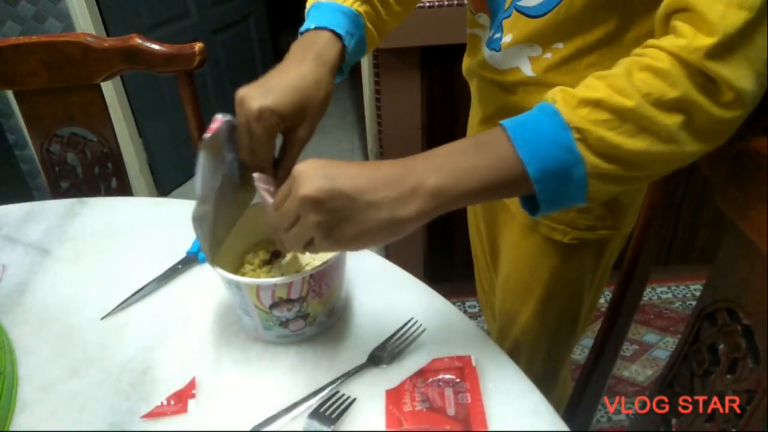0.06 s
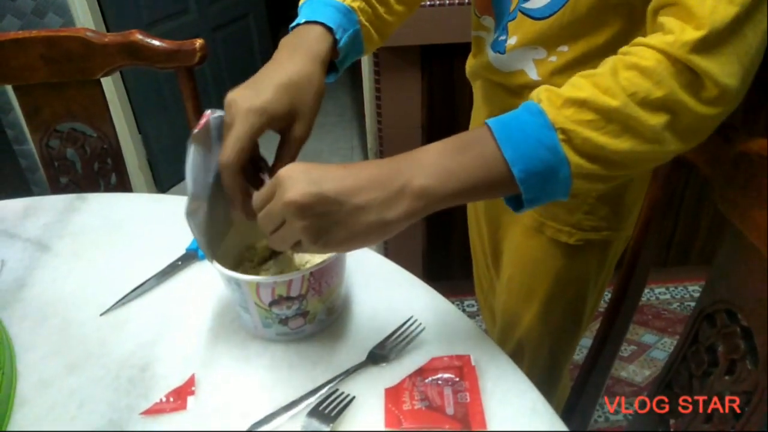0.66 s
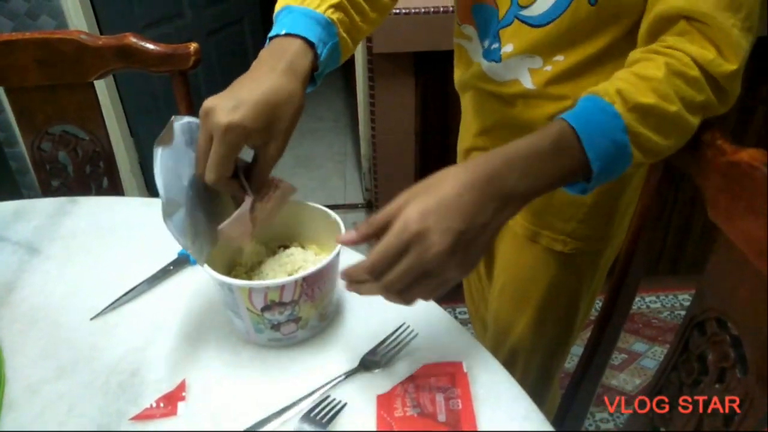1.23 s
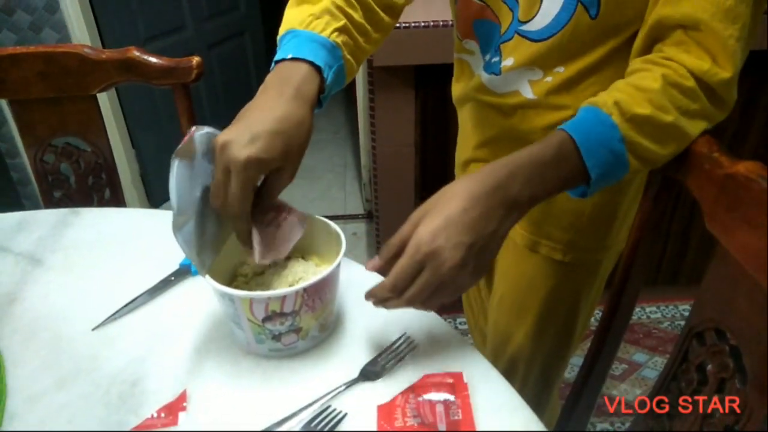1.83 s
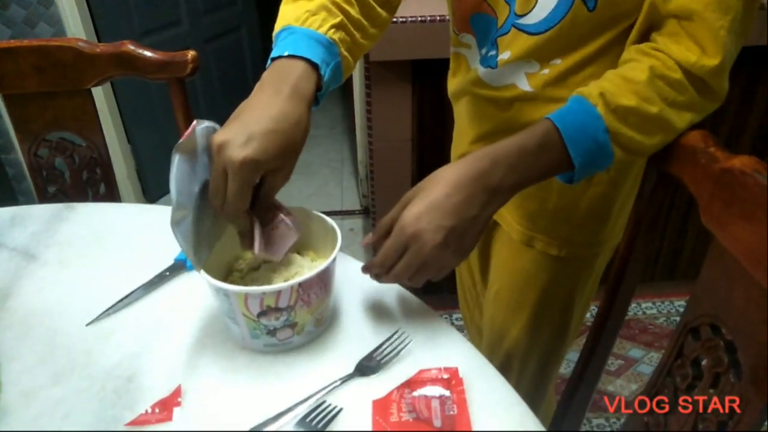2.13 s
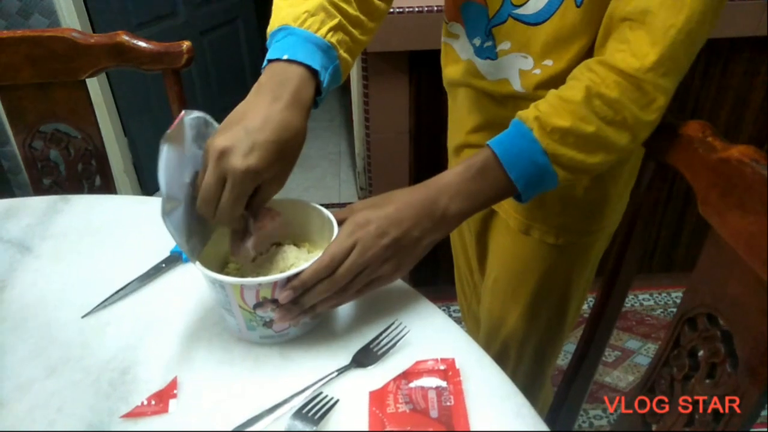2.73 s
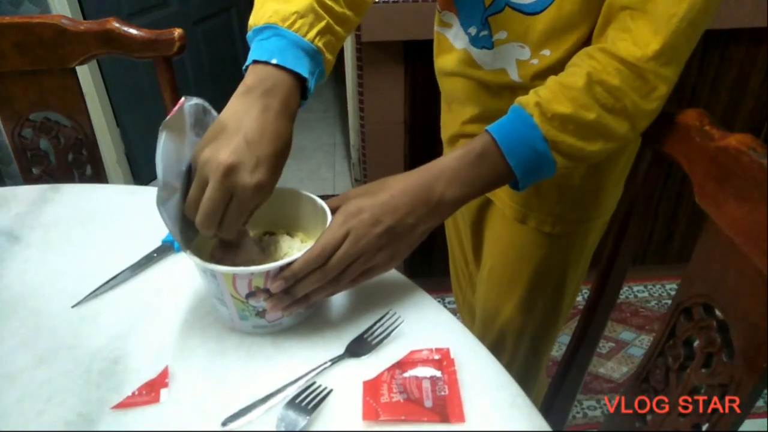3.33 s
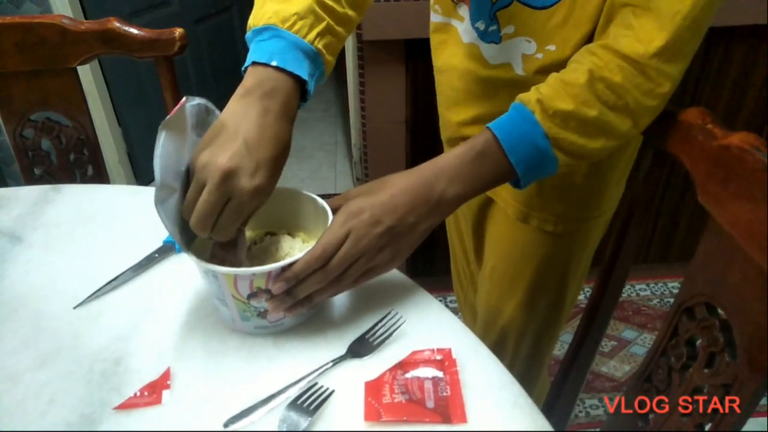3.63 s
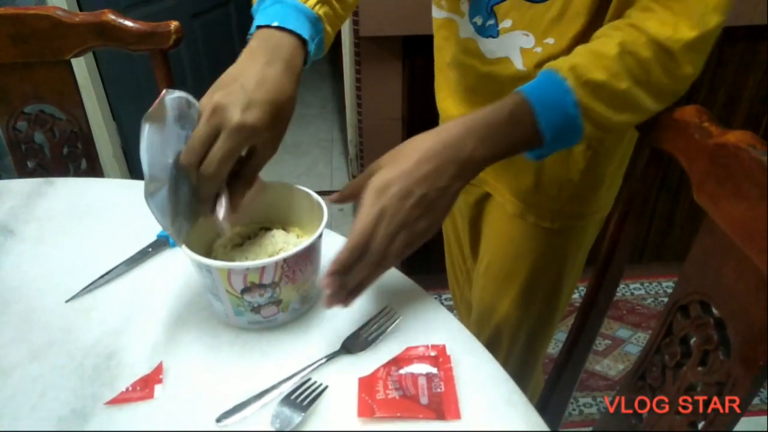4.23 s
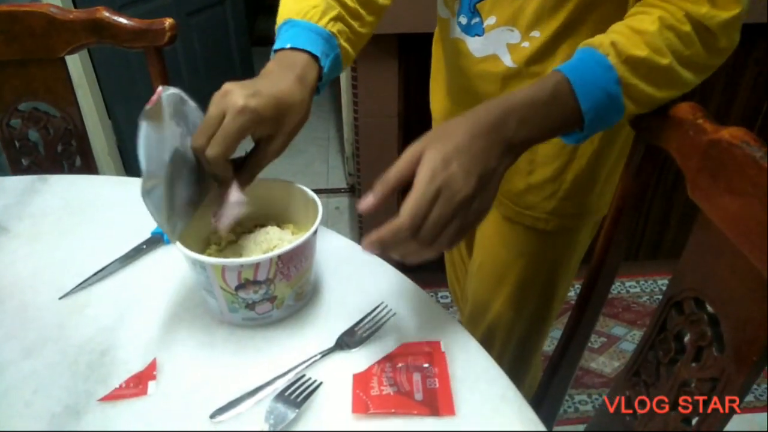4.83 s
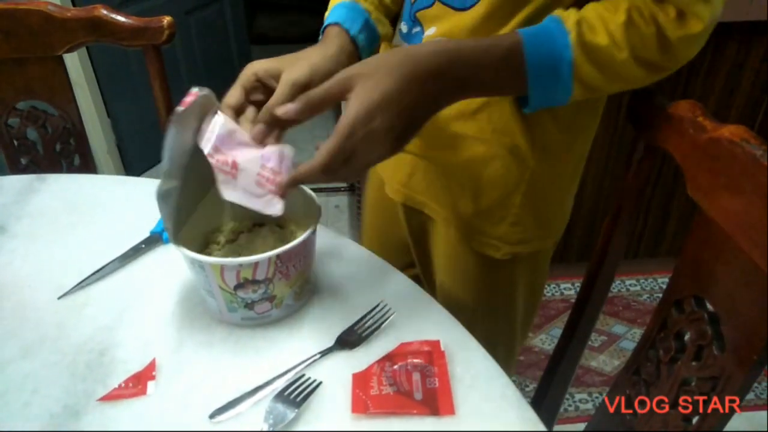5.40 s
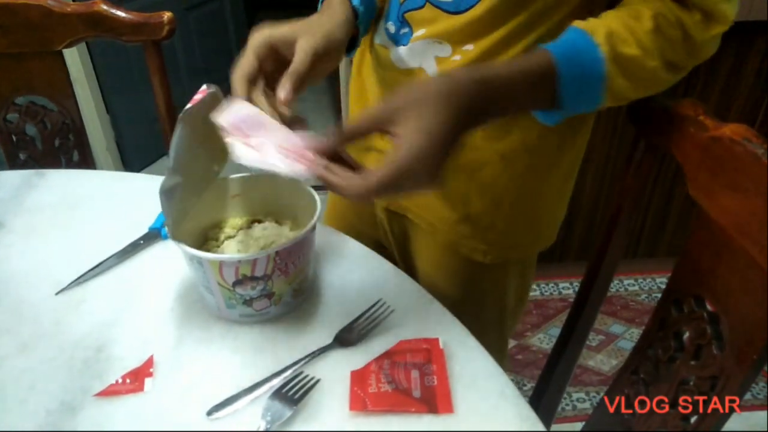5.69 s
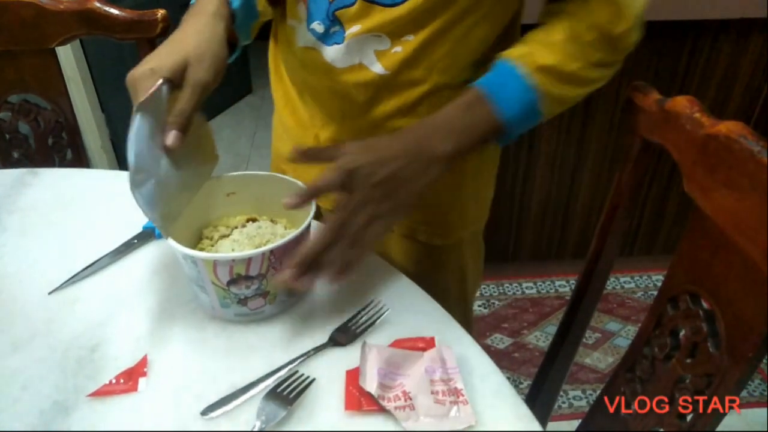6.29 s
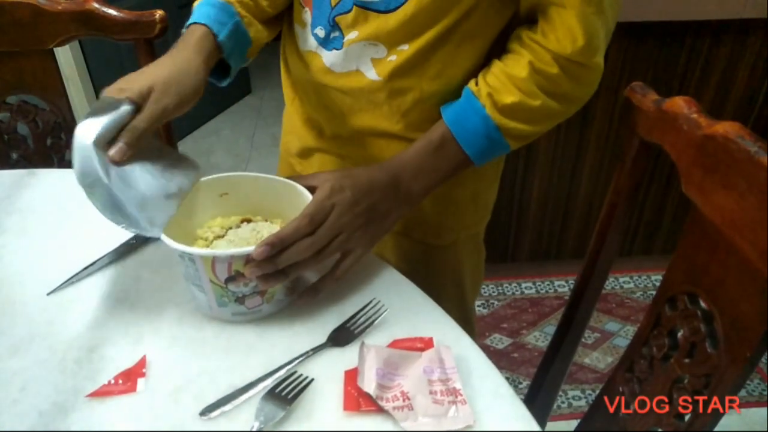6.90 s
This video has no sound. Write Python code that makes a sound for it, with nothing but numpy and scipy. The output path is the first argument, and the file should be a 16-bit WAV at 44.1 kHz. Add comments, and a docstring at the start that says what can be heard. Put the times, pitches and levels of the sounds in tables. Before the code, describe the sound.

A plastic seasoning sachet is kneaded and shaken out over a paper noodle cup. Its creases give sharp snaps amid finer crinkling, with light hollow taps from the cup and brief slides of plastic on fingers. The crackling thins out, the sachet brushes the lid, and the lid is bent back with a short scrape. The microphone is close, in a small room with faint hum and sleeve rustle.

```python
"""A plastic seasoning sachet, squeezed and shaken out over a paper noodle cup on a table in a small room.
Kneaded in bouts, its creases buckle in sharp snaps, finer crinkling swells around each one, and the cup
answers hollowly. The film slides on fingers and lid; near the end it brushes the lid, which is then bent
back. A small microphone hears it close by, with room air, faint hum, sleeves and soft bumps underneath."""
import sys
import numpy as np
from scipy import signal
from scipy.fft import rfft, irfft
from scipy.io import wavfile
from scipy.ndimage import uniform_filter1d

SR = 44100
rng = np.random.default_rng(int(sys.argv[2]) if len(sys.argv) > 2 else 0)


def dump(signal):
    """Clip the signal to [-1, 1] and save it as 16-bit WAV at the path in sys.argv[1]."""
    limited = np.clip(np.atleast_2d(signal).T, -1, 1)
    pcm = np.round(limited * 32767).astype(np.int16)
    wavfile.write(sys.argv[1], SR, pcm)


N = 306495


def amp(db):
    """Decibels to gain."""
    return 10 ** (np.asarray(db) / 20)


def unit_rms(x):
    """Scales to rms 1."""
    return x / np.sqrt(np.mean(x ** 2) + 1e-20)


def unit_click(x):
    """Scales a click to the energy of two milliseconds at rms 1."""
    return x * np.sqrt(.002 * SR / (np.sum(x ** 2) + 1e-20))


def at_hz(points, hz):
    """Interpolates a curve on a log-frequency axis."""
    freqs, values = np.transpose(points)
    return np.interp(np.log(hz + 1), np.log(freqs + 1), values)


def add(mix, start_s, sound):
    """Mixes a sound in at start_s."""
    part = mix[max(round(start_s * SR), 0):][:len(sound)]
    part += sound[:len(part)]


def noise(colour, size, tilt_db=0):
    """Noise of a given colour, tilted by tilt_db an octave."""
    hz = np.fft.rfftfreq(size, 1 / SR)
    gain = amp(at_hz(colour, hz) + tilt_db * np.log2(hz + 1))
    return unit_rms(irfft(rfft(rng.standard_normal(size)) * gain, size))


def flutter(size, width):
    """A random wander of rms 1, smoothed over width samples."""
    return unit_rms(uniform_filter1d(rng.standard_normal(size), width))


def coloured(x, colour, size=1024):
    """A causal filter of unit energy, which keeps attacks sharp."""
    log_gain = np.log(amp(at_hz(colour, abs(np.fft.fftfreq(size, 1 / SR)))))
    taps = np.fft.ifft(np.exp(np.conj(signal.hilbert(log_gain)))).real
    return signal.oaconvolve(x, taps / np.linalg.norm(taps))[:len(x)]


def crackle(grains, per_s, spread_db):
    """A steady patter of grains at random times, most small and a few large."""
    out, hop = np.zeros(N), 16
    for grain in grains:
        chance, draw = rng.random((2, N // hop))
        for step in np.flatnonzero(chance < per_s / len(grains) * hop / SR):
            level_db = spread_db * min(-np.log(draw[step]), 3)
            add(out, (step + draw[step]) * hop / SR, amp(level_db) * grain)
    return unit_rms(out)


# Mains hum in the room: pitch_hz, level_db
HUM_PARTIALS = [(57.5, -73.5), (118.4, -81.5), (238, -76), (355.3, -78.5)]
# Still air around the microphone: freq_hz, gain_db
AIR_COLOUR = [(20, -2), (60, 6), (85, -11), (135, 0.5), (200, -7), (400, -12), (760, -9.5), (1000, -9),
              (1600, -10), (2700, -9), (3500, -20), (4600, -29), (8000, -36), (16000, -26)]
def room_tone(air_db=-59):
    """The room's own sound: a faint, wavering hum in steady air noise."""
    t = np.arange(N) / SR
    knots = np.linspace(0, N / SR, 40)
    hum = np.zeros(N)
    for hz, db in HUM_PARTIALS:
        waver = np.interp(t, knots, rng.standard_normal(len(knots)))
        hum += amp(db) * np.sqrt(2) * np.sin(2 * np.pi * hz * t + waver)
    return hum + amp(air_db) * noise(AIR_COLOUR, N)


# Arms moving at the table: time_s, level_db
SLEEVE_LEVELS = [(0, -55), (.4, -57), (1, -56.5), (2.3, -58), (3.8, -58), (4.5, -59.5), (5, -58.5),
                 (5.5, -59), (5.75, -57), (5.95, -63.5), (6.95, -59.5)]
# Brushing cloth: freq_hz, gain_db
CLOTH_COLOUR = [(25, 9), (110, 1), (250, -1), (450, -5.5), (1000, -1), (2200, -7), (4500, -24),
                (16000, -22.5)]
def sleeves():
    """Sleeves brush softly as the arms move."""
    level_db = np.interp(np.arange(N) / SR, *np.transpose(SLEEVE_LEVELS))
    return amp(level_db) * noise(CLOTH_COLOUR, N)


# Film sliding against lid and fingers: start_s, end_s, level_db
SLIDES = [(0, 0.051, -42), (0.462, 0.554, -48.5), (1.224, 1.285, -38.5), (2.0, 2.068, -41),
          (3.756, 3.824, -39.5), (4.206, 4.287, -39.5), (4.867, 5.109, -52.5), (5.16, 5.41, -64),
          (5.5, 5.887, -53.5)]
# Sliding film: freq_hz, gain_db
SLIDE_COLOUR = [(300, -31), (520, -1), (700, -21), (1700, -12), (2150, 2), (2700, -1), (4000, -10.5),
                (16000, -33)]
def film_slides(slips_per_s=1500):
    """Sliding film sticks and slips very finely."""
    pressure = np.zeros(N)
    for start, end, db in SLIDES:
        add(pressure, start, amp(db) * signal.windows.tukey(round((end - start) * SR)))
    slips = crackle([np.ones(1)], slips_per_s, spread_db=5.8)
    return pressure * unit_rms(coloured(slips, SLIDE_COLOUR))


# Soft bumps right at the microphone: start_s, level_db, length_s, pitch_hz
MIC_BUMPS = [(0.095, -50.5, 0.059, 39.3), (3.75, -51, 0.12, 81.5), (3.833, -45, 0.1, 36.2),
             (3.999, -48.5, 0.11, 46.4), (4.103, -44.5, 0.079, 145.5), (4.402, -37.5, 0.069, 68),
             (4.437, -35.5, 0.045, 27), (4.578, -46.5, 0.091, 52)]
def mic_bumps(wobble=0.63):
    """Dull, uneven swings of a few cycles."""
    out, t = np.zeros(N), np.arange(8192) / SR
    for start, db, length, hz in MIC_BUMPS:
        sway = 1 + wobble * flutter(len(t), 200)
        arch = np.sin(np.pi * np.minimum(t / length, 1))
        swing = np.sqrt(2) * np.sin(2 * np.pi * np.cumsum(hz * sway) / SR)
        add(out, start, amp(db) * arch * swing)
    return out


def facet_ring(hz, swell_s=0.00041):
    """A facet of film flips over and rings for a few cycles."""
    t = np.arange(256) / SR
    return unit_click(t ** 2 * np.exp(-t / swell_s) * np.sin(2 * np.pi * (hz * t + rng.random())))


def crease_tick(decay_s=0.00033, shiver_db=-15, shiver_s=0.00082):
    """The crease gives way in a fraction of a millisecond, and the film shivers after it."""
    t = np.arange(1024) / SR
    envelope = np.exp(-t / decay_s) + amp(shiver_db) * np.exp(-t / shiver_s)
    return unit_click(rng.standard_normal(len(t)) * envelope)


# The paper cup on the table and the air in it: pitch_hz, level_db, t60_s
CUP_MODES = [(599, -10, 0.045), (735, -5, 0.031), (829, 6, 0.026), (928, 0, 0.041), (1067, -4.5, 0.038),
             (1410, 6, 0.0087), (1800, -8, 0.0017), (2300, -2.5, 0.016)]
def cup_knock(spread=0.059, onset_s=0.001):
    """The cup's modes ring, a little different wherever the sachet touches."""
    t = np.arange(2048) / SR
    hz, db, t60 = np.transpose(CUP_MODES)[:, :, None]
    detune, weight = rng.standard_normal((2, len(CUP_MODES), 1))
    modes = weight * amp(db - 60 * t / t60) * np.sin(2 * np.pi * hz * (1 + spread * detune) * t)
    onset = 1 - np.exp(-(t / onset_s) ** 2)
    return unit_click(modes.sum(axis=0) * onset)


# A large crease's tick: freq_hz, gain_db
TICK_COLOUR = [(1200, -59), (2000, -18.5), (4400, 2), (5500, 1), (8000, -2), (10000, -8.5), (12000, -21.5),
               (16000, -22)]
# The airier ticks of tiny creases: freq_hz, gain_db
FIZZ_COLOUR = [(1500, -15), (4500, 1), (6000, -1.5), (8500, 1), (12500, -6.5), (16000, -27)]
# Creases buckling over the cup, levels before trims: time_s, ring_db, pitch_hz, tick_db, cup_db
CREASES = [(0.126, -23.5, 3230, -37, -35.5), (0.2536, -30.5, 2880, -33.5, -50),
           (0.4656, -27, 2870, -39, -56), (0.5564, -31, 2810, -58, -75), (0.6095, -32.0, 3000, -34, -30.5),
           (0.627, -31.5, 2900, -35, -39.5), (0.738, -33, 2860, -43.5, -68), (0.807, -33, 2700, -53, -64),
           (0.9091, -28.5, 2960, -37, -42.5), (0.993, -31.5, 3100, -38, -58), (1.0565, -17, 2890, -27, -46),
           (1.0841, -25, 2600, -23.5, -58), (1.2132, -23.5, 3070, -23, -35.0),
           (1.2435, -13.5, 3090, -31, -32), (1.247, -15.5, 2770, -30.5, -35),
           (1.3347, -19.5, 3020, -32, -52), (1.3546, -21, 2680, -33, -46.0),
           (1.3784, -20, 2800, -27.5, -39), (1.472, -20.5, 3050, -26.5, -58),
           (1.6098, -17.5, 3060, -23.5, -38), (1.7465, -15.0, 2960, -42, -43),
           (1.761, -14.5, 2620, -27.5, -31.5), (1.8221, -19.5, 3160, -33.5, -70),
           (1.8895, -17.5, 3050, -32.5, -36), (1.8982, -17, 3030, -28.0, -40), (2.004, -9, 2910, -27, -38),
           (2.0333, -51, 2890, -57, -29.5), (2.136, -22, 3750, -38, -33.5),
           (2.1465, -11.0, 2910, -21.5, -33), (2.431, -27, 3060, -33.5, -66),
           (2.4665, -35, 2980, -31.5, -76), (2.5313, -14.5, 3390, -21.5, -31),
           (2.5632, -42, 2720, -53, -33.5), (2.652, -21, 2740, -25.5, -27), (2.6773, -20.0, 3200, -30, -40),
           (2.739, -23.5, 3620, -28.5, -50), (2.7668, -14.5, 2600, -28, -28.0),
           (2.8663, -11, 2750, -20, -44), (2.968, -10.5, 2810, -25.5, -32),
           (3.0703, -14, 3110, -21.5, -34.5), (3.1741, -23.5, 2860, -31, -52),
           (3.2028, -24, 3140, -41, -42), (3.2574, -17.5, 2930, -49, -81), (3.3033, -24, 2840, -29.5, -39),
           (3.4168, -23, 2880, -36.0, -43.5), (3.518, -38.5, 3030, -39, -38), (3.5606, -39, 3040, -39, -39),
           (3.6568, -28, 2700, -34, -49), (3.6724, -20.5, 3160, -33.5, -30),
           (3.8736, -27, 3000, -32.5, -35.5), (3.906, -23, 3210, -36, -42.5),
           (3.9999, -23, 3020, -34, -39.5), (4.0341, -21, 2700, -34, -39.5),
           (4.229, -18.5, 2860, -28.5, -41), (4.2755, -30.5, 3160, -54, -50),
           (4.3228, -29.5, 3070, -50, -72), (4.3363, -22, 3100, -31.5, -71),
           (4.4109, -25, 2990, -56, -44.5), (4.6011, -28.5, 2930, -42.5, -48),
           (4.6451, -31, 3220, -42.5, -73), (4.6903, -41, 3030, -40, -62.5),
           (4.8673, -33.0, 3090, -33.5, -43), (4.884, -23, 2920, -27, -31), (4.974, -28, 2850, -35.5, -38),
           (4.9798, -26, 3010, -32.5, -34.5), (5.0244, -31, 2830, -37.5, -36),
           (5.085, -32.5, 3150, -35.0, -52), (5.0978, -27.5, 3140, -38, -75),
           (5.1091, -40, 3350, -32.5, -70), (5.1818, -27.5, 3220, -35.5, -50),
           (5.2825, -32.5, 2900, -46, -78), (5.3263, -42, 3280, -48, -66),
           (5.6726, -30.5, 3170, -29.5, -72), (5.7618, -19, 3310, -32, -54), (6.146, -53, 2660, -68.5, -65),
           (6.249, -52.5, 2750, -70.5, -66)]
def snaps(jerk_db=-15, jerk_s=.0014, neighbour_db=-16, scatter_s=.014, crumble_below_db=-20):
    """Each large crease snaps in a few quick jerks, and small neighbours give way after it."""
    film, ticks, fizz, cup = np.zeros((4, N))
    for time, ring_db, hz, tick_db, cup_db in CREASES:
        add(film, time, amp(ring_db - .5) * facet_ring(hz))
        add(ticks, time, amp(tick_db + 1) * crease_tick())
        add(cup, time, amp(cup_db - 1.5) * cup_knock())
        crumble_db = 0.44 * (crumble_below_db - ring_db)  # strong creases go at once, weak ones crumble
        jerks = [(time + side * jerk_s * (1 + .5 * rng.random()), jerk_db) for side in (-1, 1)]
        neighbours = [(time + scatter_s * abs(lag), neighbour_db) for lag in rng.standard_normal(4)]
        for at, share_db in jerks + neighbours:
            size, detune = rng.standard_normal(2)
            gain = amp(share_db + crumble_db + 2 * size)
            add(film, at, gain * amp(ring_db) * facet_ring(hz * np.exp(0.17 * detune - .05)))
            add(fizz, at, gain * amp(tick_db - 4) * crease_tick())
    return film + coloured(ticks, TICK_COLOUR) + coloured(fizz, FIZZ_COLOUR) + cup


def add_swell(mix, peak_s, peak_db, build_s, ease_s):
    """Adds pressure that builds up to peak_s and eases off."""
    t = np.arange(-min(peak_s, .12), .2, 1 / SR)
    add(mix, peak_s + t[0], amp(peak_db) * np.exp(np.minimum(t / build_s, -t / ease_s)))


# Bouts of kneading over the cup: start_s, end_s, effort_db
KNEADING_BOUTS = [(.74, .83, -49), (0.933, 1.157, -42.5), (1.28, 1.7, -45.5), (1.725, 2.202, -44.5),
                  (2.247, 2.32, -50.5), (2.365, 2.46, -42), (2.53, 3.165, -43.5), (3.127, 3.35, -49),
                  (3.379, 3.432, -40.5), (3.51, 3.575, -54), (3.726, 4.12, -48), (4.318, 4.423, -48.5),
                  (4.61, 4.716, -57), (4.806, 5.127, -51.5), (5.408, 5.496, -54.5), (5.577, 5.85, -56)]
def squeezes(firm_db=-20.5, firm_build_s=.011, touch_db=-17):
    """Effort on the film and contact with the cup: bouts of kneading, and a swell around each snap."""
    kneading, swells, pressing = np.zeros((3, N))
    for start, end, db in KNEADING_BOUTS:
        add(kneading, start, amp(db) * signal.windows.tukey(round((end - start) * SR), 0.31))
    for time, ring_db, _, _, cup_db in CREASES:
        build_s = firm_build_s * amp(0.49 * (ring_db - firm_db))  # stronger creases resist longer
        force_db = 0.58 * ring_db + 0.33 * cup_db - 11
        add_swell(swells, time, force_db, build_s, ease_s=0.015)
        add_swell(pressing, time, cup_db - 14, build_s=0.0083, ease_s=0.029)
    return np.hypot(kneading, swells), amp(touch_db) * kneading + pressing


def crinkle(tiny_per_s=600, pitch_hz=2850, variants=60):
    """Many tiny creases and a few middling ones give way in each squeeze; the cup answers when touched."""
    effort, contact = squeezes()
    pitches = pitch_hz * np.exp(.14 * rng.standard_normal(variants))
    facets = [facet_ring(hz, swell_s=0.00034) for hz in pitches]
    rings = crackle(facets, tiny_per_s, spread_db=4)
    ticks = crackle([crease_tick(0.00078) for _ in range(variants)], tiny_per_s, spread_db=4)
    fizz = unit_rms(coloured(ticks, FIZZ_COLOUR))
    clicks = [ring + amp(-9) * coloured(crease_tick(.0003), TICK_COLOUR)[:len(ring)] for ring in facets]
    middling = crackle(clicks, per_s=45, spread_db=3.2)
    cup = crackle([cup_knock() for _ in range(variants)], per_s=170, spread_db=2.4)
    film = amp(-5) * rings + amp(-11) * fizz + amp(-4) * middling
    return effort * film + contact * amp(-2) * cup


# A dull brush against the cup's lid, then the lid bending and scraping:
# start_s, level_db, rise_s, decay_s, tilt_db_per_octave
LID_TOUCHES = [(5.763, -44.5, 0.0099, 0.037, -5.5), (6.426, -55.5, 0.029, 0.029, -4.5),
               (6.48, -36, 0.0025, 0.044, -5.5), (6.5087, -25, 0.00094, 0.0021, 5.5),
               (6.514, -39, 0.002, 0.054, 1), (6.554, -34.5, 0.00068, 0.0028, 3),
               (6.63, -57.5, 0.023, 0.096, -2), (6.852, -43.5, 0.018, 0.025, -2.5)]
# Foil-backed paper: freq_hz, gain_db
FOIL_PAPER_COLOUR = [(130, -41), (250, -9), (370, -9.5), (450, 2), (580, 6.5), (780, -3), (1030, -9),
                     (1400, 2.5), (2100, -4), (3600, -8), (8000, -32), (16000, -72)]
def lid(grain_db=3):
    """The sachet brushes the foil-paper lid with a dull thud; later the lid bends in grainy bursts."""
    out, t = np.zeros(N), np.arange(16384) / SR
    for start, db, rise, decay, tilt_db in LID_TOUCHES:
        envelope = np.minimum(t / rise, 1) * np.exp(-np.maximum(t - rise, 0) / decay)
        grain = unit_rms(amp(grain_db * flutter(len(t), 70)))
        add(out, start, amp(db) * envelope * grain * noise(FOIL_PAPER_COLOUR, len(t), tilt_db))
    return out


# Decay of the small room: freq_hz, t60_s
ROOM_DECAY = [(200, 0.13), (800, 0.24), (3000, 0.24), (7000, 0.33), (14000, 0.29)]
def room_tail(onset_s=0.0063):
    """A diffuse room response of unit energy, each band dying at its own speed."""
    hz, t, bands = signal.stft(rng.standard_normal(SR // 2), SR, nperseg=256)
    decay = amp(-60 * t / at_hz(ROOM_DECAY, hz)[:, None])
    response = signal.istft(bands * decay, SR, nperseg=256)[1]
    response *= np.minimum(np.arange(len(response)) / SR / onset_s, 1) ** 2
    return response / np.linalg.norm(response)


# Echoes reaching the microphone off the table and the body: delay_s, gain
FIRST_ECHOES = [(.0011, 0.13), (.0025, 0.013), (.0078, -0.044), (.0093, -.1), (0.0106, 0.068),
                (0.0138, -0.086)]
def room(direct, wet_db=-8, tails=3):
    """First echoes, then tails that crossfade as the hands move about."""
    out, t = direct.copy(), np.arange(N) / SR
    for delay, gain in FIRST_ECHOES:
        add(out, delay, gain * direct)
    for k in range(tails):
        share = np.sqrt(2 / tails) * np.cos(np.pi * (1.757 * t + k / tails))
        out += amp(wet_db) * signal.oaconvolve(direct * share, room_tail())[:N]
    return out


def scene():
    """Sachet, cup and lid from close by, in mono, over the quiet of the room."""
    at_table = snaps() + crinkle() + film_slides() + lid()
    return (room(at_table) + mic_bumps() + room_tone() + sleeves())[None]


def record(dry, dip_hz=4560, dip_q=8, depth=0.38, edge_hz=16200):
    """The small microphone's narrow treble dip, then the band limit."""
    dip_band = signal.lfilter(*signal.iirpeak(dip_hz, dip_q, fs=SR), dry)
    lowpass = signal.firwin(301, edge_hz, window=("kaiser", 9), fs=SR)
    return signal.oaconvolve(dry - depth * dip_band, lowpass[None], "same")


dry = scene()
out = record(dry)
dump(out)
```